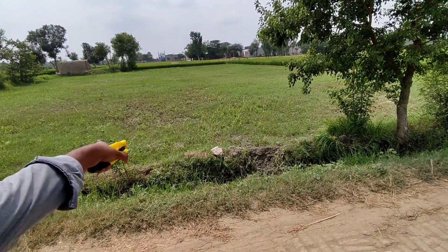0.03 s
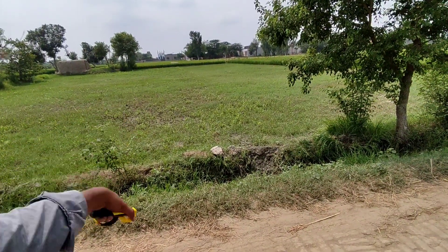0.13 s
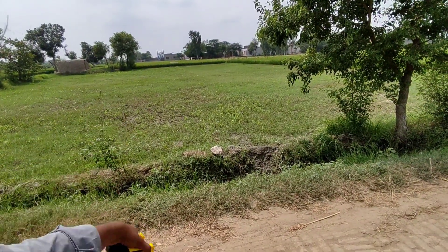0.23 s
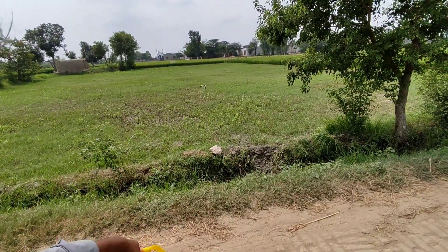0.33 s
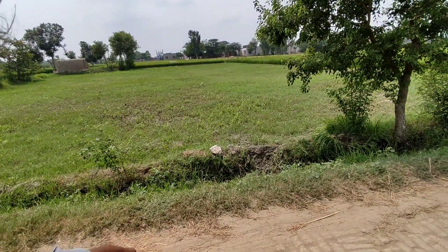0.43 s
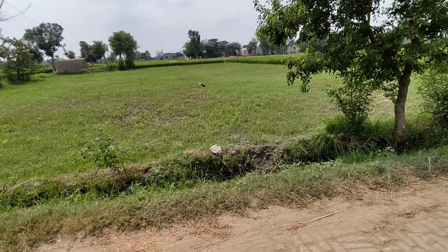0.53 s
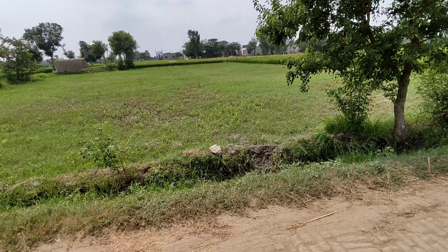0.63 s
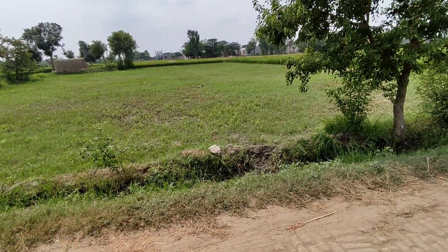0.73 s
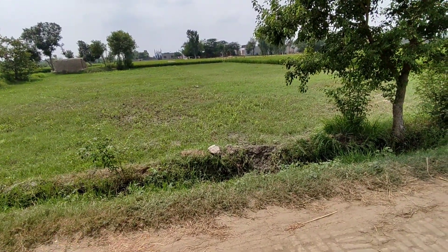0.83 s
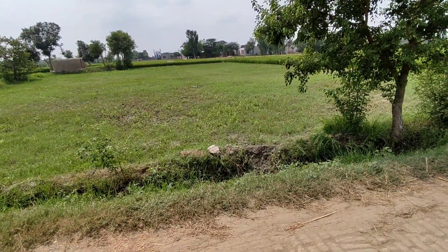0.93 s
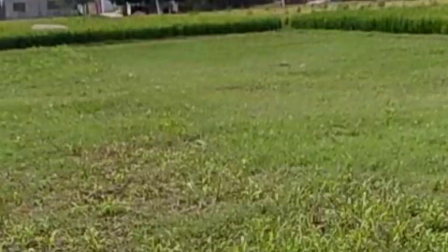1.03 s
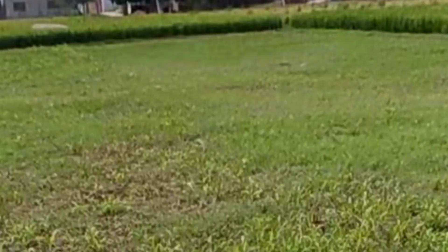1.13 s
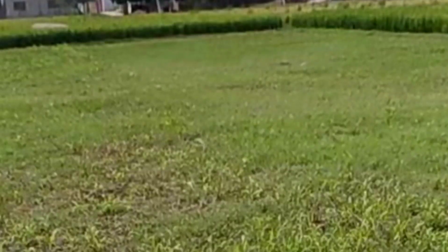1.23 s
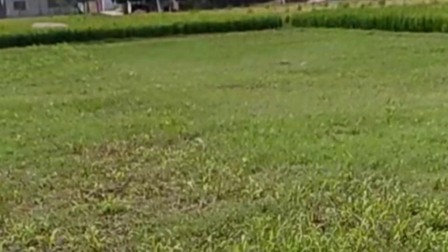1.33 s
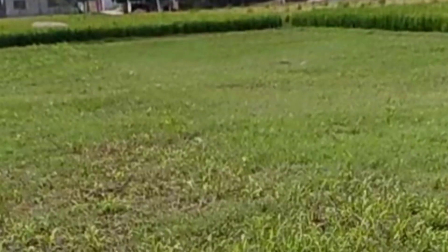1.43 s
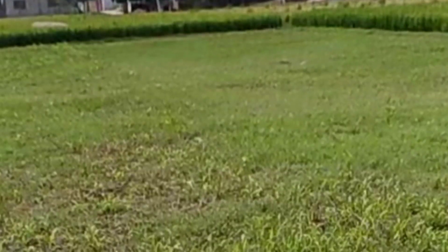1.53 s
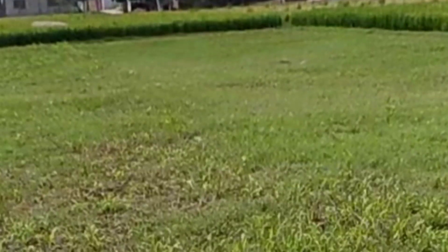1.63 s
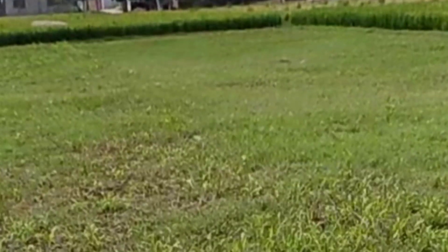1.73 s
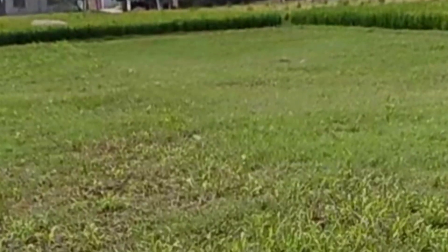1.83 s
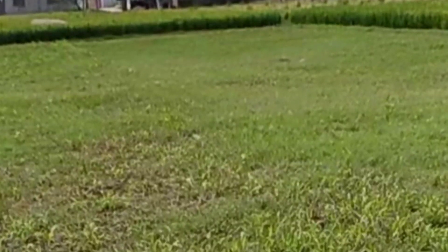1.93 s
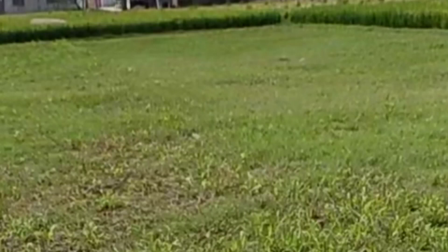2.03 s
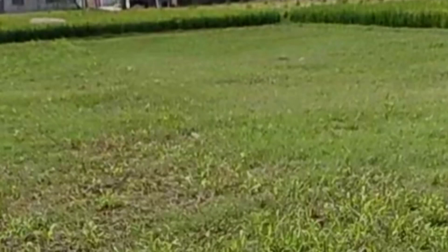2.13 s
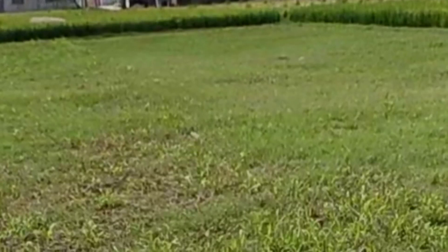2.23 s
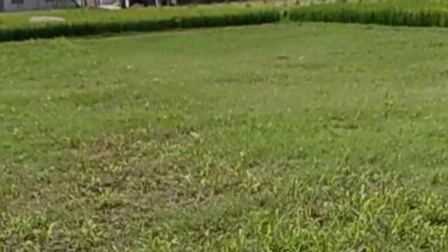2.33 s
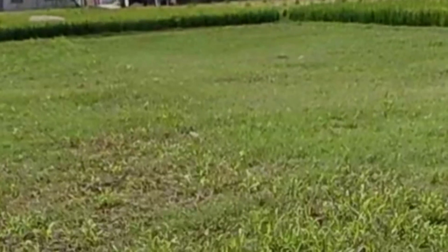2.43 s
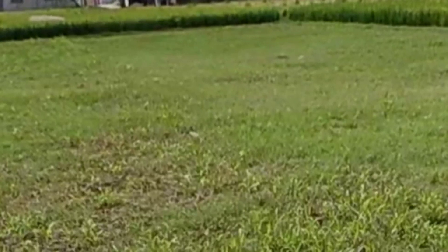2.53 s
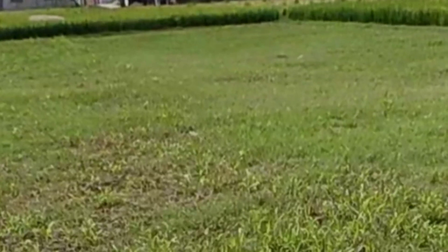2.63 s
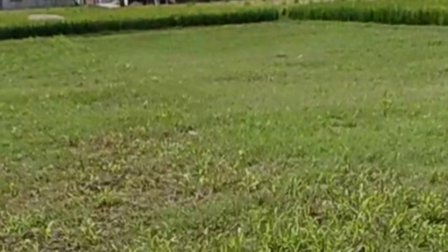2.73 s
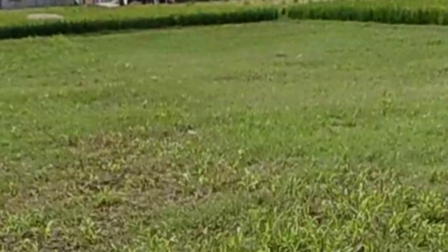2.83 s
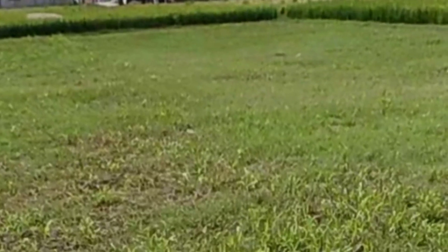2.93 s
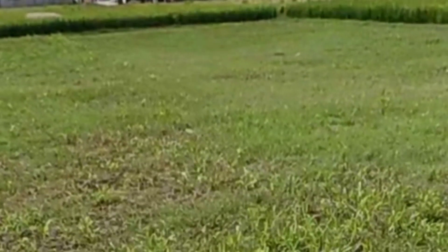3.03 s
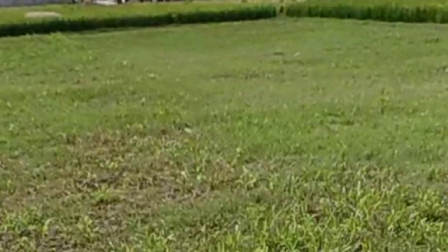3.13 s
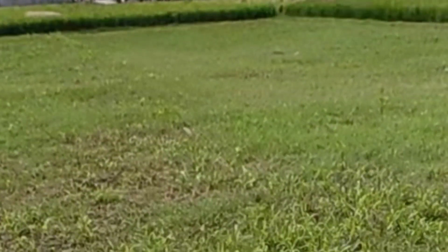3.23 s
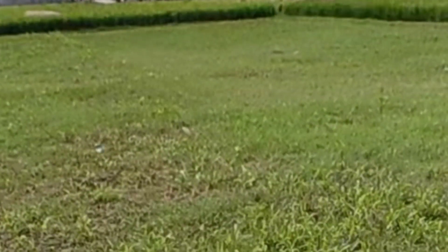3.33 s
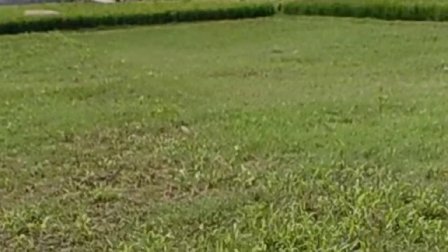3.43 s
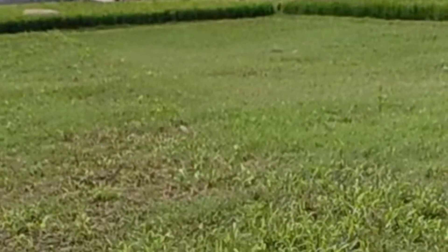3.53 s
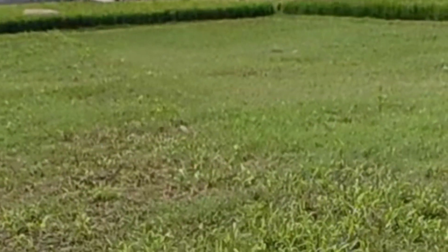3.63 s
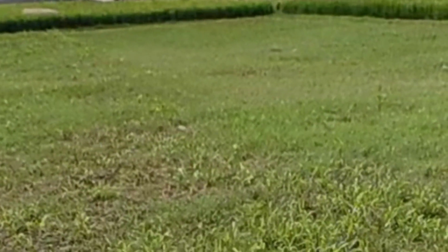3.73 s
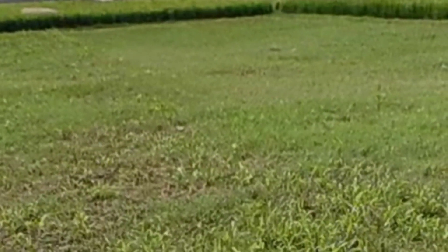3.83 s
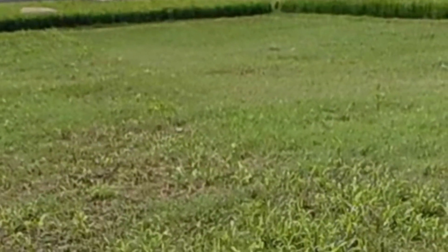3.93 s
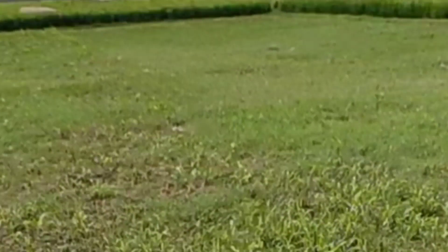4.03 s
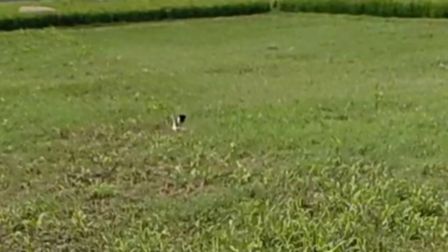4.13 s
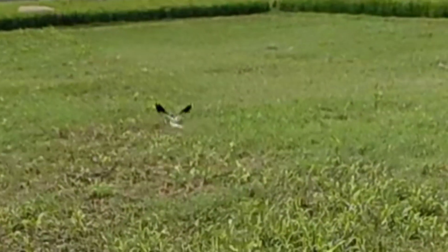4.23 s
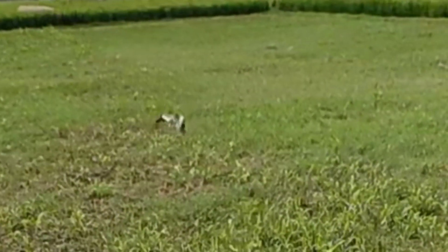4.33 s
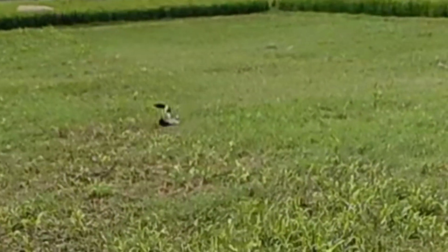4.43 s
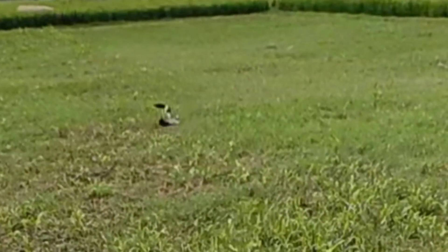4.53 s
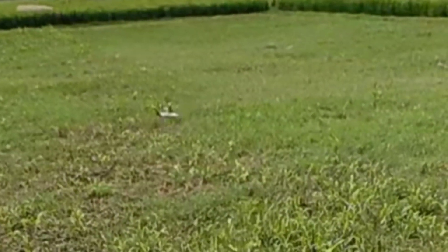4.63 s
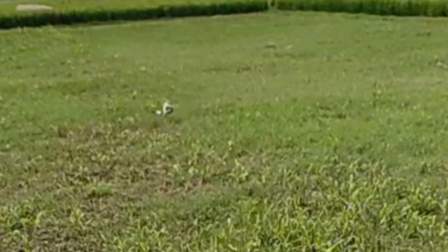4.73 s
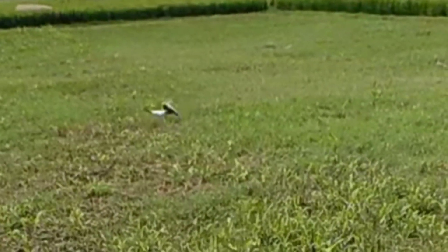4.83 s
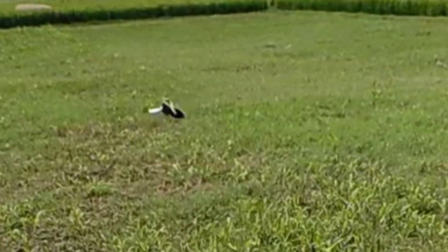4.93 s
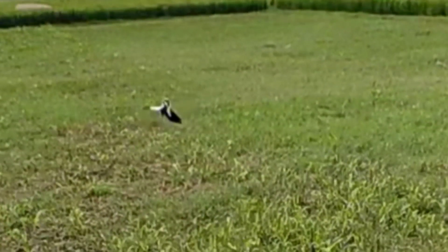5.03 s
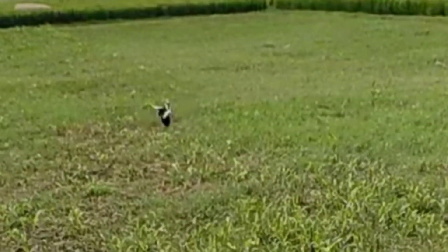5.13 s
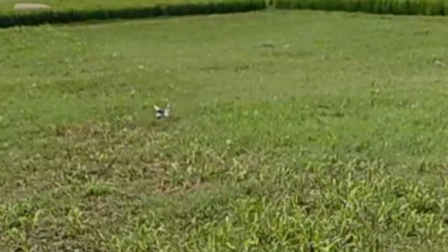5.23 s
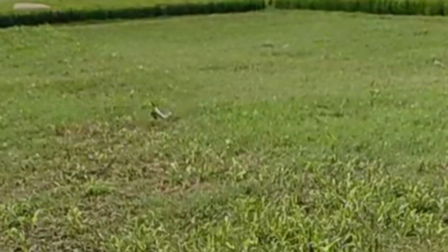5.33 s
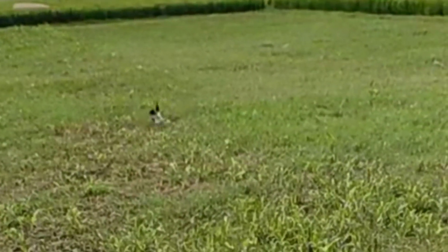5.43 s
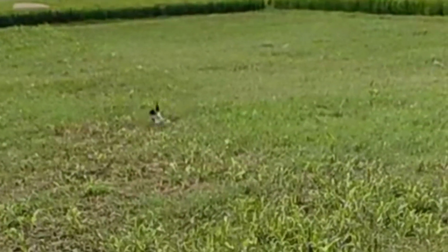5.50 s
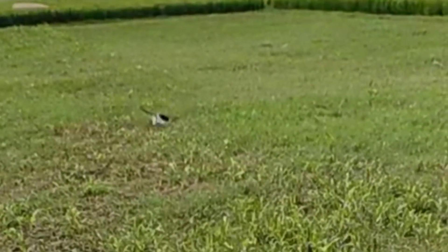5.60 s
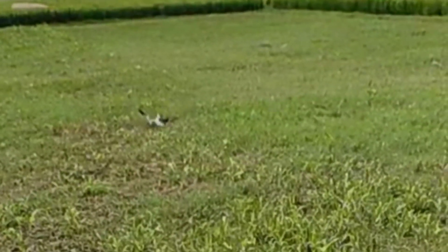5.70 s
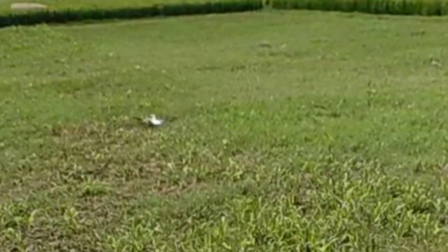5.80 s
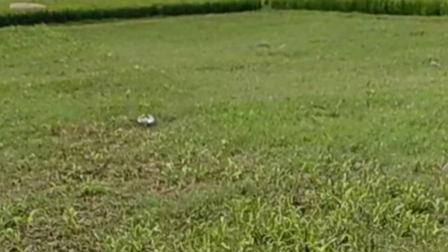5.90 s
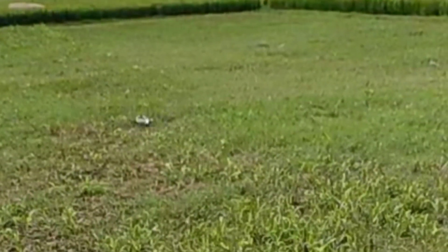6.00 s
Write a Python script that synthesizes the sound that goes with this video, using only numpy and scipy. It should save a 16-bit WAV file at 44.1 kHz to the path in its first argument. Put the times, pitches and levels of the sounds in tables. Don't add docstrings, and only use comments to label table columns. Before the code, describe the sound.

Quick elastic crack outdoors, then a muffled slow-motion replay: throbbing insect whine, three clustered rubber slaps, a hushed dip, cloth rustle and soft slack taps.

```python
import sys
import numpy as np
from scipy import signal
from scipy.fft import rfft, irfft
from scipy.io import wavfile
from scipy.ndimage import uniform_filter1d

SR = 44100
rng = np.random.default_rng(int(sys.argv[2]) if len(sys.argv) > 2 else 0)


def convert_level_to_amplitude(level_db):
    exponent = np.asarray(level_db, float) / 20
    return 10 ** exponent


def unload_audio(sound):
    columns = np.transpose(np.atleast_2d(sound))
    steps = np.round(np.clip(columns, -1, 1) * 32767)
    wavfile.write(sys.argv[1], SR, steps.astype(np.int16))


N = 267378
LENGTH = 330000
T = np.arange(LENGTH) / SR

# frequency [Hz], density [dB per Hz].
SLAP_TONE_HZ_DB = [(35, -48.5), (60, -11), (135, -14), (294, -31.5), (595, -15), (902, -25.5),
                   (1120, -20.5), (1730, -9.5), (2920, -2), (4190, -14), (4500, -38.5), (5850, -46.5),
                   (9900, -120)]
# time [s], gain [dB].
DUCK_S_DB = [
    (3.37, 0.5),
    (3.44, -3),
    (3.56, -10),
    (3.68, -13),
    (3.79, -3),
    (3.81, 2),
]
# time [s], lift [dB].
BREEZE_S_DB = [(1.4, -1.5), (1.9, -0.5), (2.7, 0.5), (2.92, 1), (3.3, 3.5), (3.82, 11.5), (3.93, 1),
               (4.2, 2), (4.5, -3), (4.65, 5.5), (5.0, -1.5), (5.6, -1.5), (5.8, -3.5), (6.2, -4),
               (6.5, -1), (6.7, 5), (6.95, 2)]


def evened(x):
    return x / np.sqrt(np.mean(x ** 2) + 1e-20)


def along(rows):
    s, *columns = np.transpose(rows)
    return [np.interp(T, s, c) for c in columns]


def coloured(points, shape):
    hz, db = np.transpose(points)
    bins_hz = np.fft.rfftfreq(shape[-1], 1 / SR)
    gain = convert_level_to_amplitude(np.interp(np.log(bins_hz + 1), np.log(hz + 1), db))
    return evened(irfft(rfft(rng.standard_normal(shape)) * gain, shape[-1]))


def resonate(x, hz, width_hz):
    turn = np.exp(2j * np.pi * np.cumsum(hz * np.ones(x.shape[-1])) / SR)
    r = np.exp(-np.pi * width_hz / SR)
    low = signal.lfilter([(1 - r) ** 2], [1, -2 * r, r * r], x * turn.conj())
    return evened((turn * low).real)


def ports(a, b, same, lag_s):
    same = np.clip(same, 0, 1)
    return np.array([np.roll(a, round(lag_s * SR)), same * a + np.sqrt(1 - same ** 2) * b])


def wander(size):
    return evened(uniform_filter1d(uniform_filter1d(rng.standard_normal(LENGTH), size), size))


def swell(s, rise_db_per_s, fall_db_per_s):
    drop_db = np.where(T < s, rise_db_per_s * (s - T), fall_db_per_s * (T - s))
    return convert_level_to_amplitude(-np.minimum(drop_db, 200))


def slaps():
    # time [s], left [dB], right [dB].
    snap_rows = [(3.3834, -36.5, -24.5), (3.3862, -27, -33.5), (3.3954, -27.5, -25.5), (3.403, -31, -39),
                 (3.4056, -38, -28), (3.4358, -27.5, -29), (3.4424, -13.5, -11), (3.4465, -21, -28.5),
                 (3.4533, -25, -25), (3.4587, -27, -21.5), (3.4625, -31.5, -25), (3.4688, -26.5, -31.5),
                 (3.4903, -42.5, -28.5), (3.5055, -33, -22), (3.5118, -15, -30), (3.5199, -23, -33),
                 (3.523, -23, -35.5), (3.5282, -22.5, -21), (3.5378, -29.5, -40.5), (3.5417, -30, -36.5),
                 (3.547, -43.6, -35.0)]
    # time [s], left [dB], right [dB], extra thud [dB].
    tap_rows = [(2.2362, -42, -63.5, -6), (2.2484, -44.5, -55, -8), (3.9419, -49, -32.5, -7),
                (3.956, -45, -42.5, 1), (4.4272, -54, -36, 4.5), (4.5468, -53, -33.5, -4),
                (4.556, -32.5, -40, 9), (4.5634, -32, -30, 9), (4.5824, -51.5, -32.5, -6),
                (4.601, -39, -52.5, -4), (4.6734, -38, -46, 1), (4.736, -36, -35.5, 31),
                (4.744, -32.5, -36, 14.5), (4.7626, -39, -56, -15)]
    # frequency [Hz], density [dB per Hz].
    thud_tone = [(59, -28.5), (100, 4), (160, -12.5), (322, -6), (651, -2), (907, -17), (1200, 3.5),
                 (1500, -14.5), (1720, -16.5), (1900, -18), (2470, -42.5), (4180, -120)]
    rise_s, ring_t60_s, crack_t60_s, crack_db = .0016, .007, .035, -8
    ring_hz, ring_spread_hz, ring_left_hz_per_db = 2830, 100, 7
    thud_db, thud_left_per_db, volley_thud_db = -17.5, .27, 9
    out = np.zeros((2, LENGTH))
    t = np.arange(-200, 3800) / SR
    rise = np.exp(-(np.minimum(t, 0) / rise_s) ** 2)
    after = np.maximum(t, 0)
    hits = [(*row, volley_thud_db * (k < 5)) for k, row in enumerate(snap_rows)] + tap_rows
    for s, left_db, right_db, extra_db in hits:
        lean_db = left_db - right_db
        hz = ring_hz + ring_left_hz_per_db * lean_db + ring_spread_hz * rng.standard_normal()
        low_db = thud_db + thud_left_per_db * np.clip(lean_db, -12, 12) + extra_db
        phase = .25 * rng.random((2, 1))
        port_hz = hz * (.98 + .04 * rng.random((2, 1)))
        ring = np.sqrt(2) * np.cos(2 * np.pi * (port_hz * t + phase)) * convert_level_to_amplitude(-60 * after / ring_t60_s)
        crack = coloured(SLAP_TONE_HZ_DB, (2, len(t))) * convert_level_to_amplitude(crack_db - 60 * after / crack_t60_s)
        thud = coloured(thud_tone, (2, len(t))) * convert_level_to_amplitude(low_db - 60 * after / crack_t60_s)
        slap = rise * (ring + crack + thud)
        slap *= np.sqrt(2) / abs(slap).max(axis=1, keepdims=True)
        at = round(s * SR) - 200
        out[:, at:at + len(t)] += convert_level_to_amplitude(np.array([[left_db], [right_db]]) + 1.0) * slap
    edge = signal.firwin(511, 4450, window=("kaiser", 7), fs=SR)
    return signal.oaconvolve(out + swish(), edge[None], "same")


def swish():
    # time [s], left [dB], right [dB], fall [dB/s].
    swish_rows = [
        (3.378, -33.5, -29, 400.5),
        (3.437, -24.5, -27.5, 300.5),
        (3.507, -26, -26.5, 600),
        (3.56, -51.5, -52.5, 95),
        (3.811, -50.5, -51, 72),
        (4.452, -64.5, -71, 904.5),
        (4.557, -34.5, -56, 497),
        (4.738, -40, -40.5, 402),
    ]
    level = 0
    for s, left_db, right_db, fall in swish_rows:
        level = level + convert_level_to_amplitude(np.array([[left_db], [right_db]])) * swell(s, 2197.5, fall)
    return level * convert_level_to_amplitude(2.7 * wander(size=40)) * coloured(SLAP_TONE_HZ_DB, (2, LENGTH))


def pushes():
    # time [s], left pressure, right pressure [full scale], rise [s], fall [s].
    push_rows = [(3.386, -0.021, -0.021, 0.00413, 0.0074), (3.4, 0.00797, 0.0085, 0.054, 0.01464),
                 (3.445, 0.0077, -0.062, 0.0047, 0.027), (3.68, -0.025, 0.035, .09, 0.55),
                 (3.815, 0.019, 0.019, 0.00776, 0.089), (5.17, -0.0024, -0.0053, 0.081, 0.045),
                 (5.195, 0.002, 0.0074, 0.0045, 0.012), (5.215, 0.0064, -0.015, 0.024, 0.031),
                 (5.57, -0.0032, -0.014, 0.018, 0.014), (5.615, 0.0065, -0.008, 0.0098, 0.009),
                 (5.648, -0.0041, 0.031, 0.0058, 0.011), (5.68, 0.0026, -0.013, 0.036, 0.09),
                 (6.85, -0.00024, -0.0093, 0.049, 0.037), (6.94, -0.0015, 0.046, 0.0097, 0.008),
                 (6.96, 0.01, -0.02, 0.035, 0.011)]
    out = np.zeros((2, LENGTH))
    t = np.arange(-12000, 20000) / SR
    for s, left, right, rise_s, fall_s in push_rows:
        shape = np.exp(-(np.minimum(t, 0) / rise_s) ** 2 - np.maximum(t, 0) / fall_s)
        at = round((s + t[0]) * SR)
        out[:, at:at + len(t)] += np.array([[left], [right]]) * shape
    return uniform_filter1d(out, size=150, axis=1)


def rustle():
    # time [s], peak [dB], rise [dB/s], fall [dB/s].
    move_rows = [
        (3.81, -52, 798, 363.5),
        (4.1, -61, 22.5, 111.5),
        (4.55, -58.5, 95.5, 51.5),
        (4.7, -57, 92.5, 129.5),
        (4.95, -73.5, 32.5, 18),
        (5.8, -67.5, 39.5, 6.5),
        (6.4, -69, 18.5, 37),
        (7.2, -60, 82, 38.5),
    ]
    # time [s], centre [Hz], narrow share [0-1].
    tint_rows = [(3.8, 1200, .3), (3.95, 1700, .1), (4.9, 1800, .1), (5.5, 1420, 1), (6.4, 1400, .9),
                 (6.6, 550, .9)]
    hz, narrow = along(tint_rows)
    grains = rng.standard_normal((2, LENGTH)) * convert_level_to_amplitude(3.5 * wander(size=200))
    sound = narrow * resonate(grains, hz, 1500) + (1 - narrow) * resonate(grains, hz, 2803)
    level = sum(convert_level_to_amplitude(db) * swell(s, rise, fall) for s, db, rise, fall in move_rows)
    return level * convert_level_to_amplitude(np.array([[2.5], [-2.5]])) * sound


def knock():
    parts_hz_width_db = [(239, 90, -55.5), (400, 220, -65.5), (800, 670, -68)]
    body = sum(convert_level_to_amplitude(db) * resonate(rng.standard_normal(LENGTH), hz, width_hz)
               for hz, width_hz, db in parts_hz_width_db)
    return swell(2.7, rise_db_per_s=720, fall_db_per_s=450) * body


def cicada(level_db, hz, pan_db, depth_db, throb_hz, width_hz, skirt_db, tone_db):
    belly, wings = rng.standard_normal((2, 2, LENGTH))
    turns = np.cumsum(throb_hz * (1 + 0.04 * wander(size=6000))) / SR
    throb = convert_level_to_amplitude(depth_db * (np.cos(2 * np.pi * turns) + 0.21 * np.cos(4 * np.pi * turns + 2.9)))
    tone_turns = np.cumsum(hz + 22 * wander(size=500)) / SR
    tone = convert_level_to_amplitude(tone_db) * np.sqrt(2) * np.cos(2 * np.pi * tone_turns)
    song = (tone + resonate(belly, hz, width_hz)) * throb
    song = song + convert_level_to_amplitude(skirt_db) * resonate(wings, hz * 1.1, 400)
    gain = convert_level_to_amplitude(level_db + pan_db * np.array([[.5], [-.5]]))
    return gain * evened(ports(*song, same=.6, lag_s=0.0013095))


def cicadas():
    # time [s], level [dB], pitch [Hz], left over right [dB].
    long_song = [(1.4, -56, 2890, 13.5), (2.2, -59, 2895, 9.5), (2.6, -62.5, 2850, 10.5),
                 (3.25, -60, 2835, 6.5), (3.98, -59.5, 2850, 2), (4.4, -58, 2890, 9.5),
                 (4.9, -64, 2910, 22), (5.27, -65.5, 2910, 3), (5.83, -62.5, 2984, 17.5),
                 (6.1, -61, 3005, 14.5), (6.4, -62.5, 2975, 17), (6.95, -59, 2976, 12.5)]
    # time [s], level [dB], pitch [Hz].
    short_song = [(1.2, -60.5, 3020), (1.6, -63.5, 3128), (1.74, -59, 2866), (1.82, -81.5, 3012)]
    first = cicada(*along(long_song), depth_db=2.5 + 2.5 * wander(size=5000), throb_hz=17.6,
                   width_hz=140, skirt_db=-14, tone_db=-2)
    second = cicada(*along(short_song), pan_db=13.5, depth_db=0.5, throb_hz=33.33,
                    width_hz=92, skirt_db=-13.5, tone_db=0)
    return first + second


def birds():
    # start [s], length [s], first pitch [Hz], last pitch [Hz], level [dB].
    call_rows = [(1.333, 0.028, 3160, 3650, -59), (1.716, 0.055, 2150, 2564, -65.5),
                 (1.82, .054, 2480, 2247, -66.5), (2.013, 0.064, 1590, 1345, -68),
                 (2.115, 0.038, 1310, 1496, -69.5), (2.161, 0.058, 1040, 985, -62),
                 (2.389, 0.062, 1455, 1660, -73), (2.446, 0.15, 1650, 1319, -72.5),
                 (3.803, .15, 1120, 1030, -59), (4.058, 0.072, 1772, 1368, -65),
                 (5.772, 0.044, 1720, 1380, -63.5)]
    out = np.zeros(LENGTH)
    for start_s, length_s, first_hz, last_hz, db in call_rows:
        at = round(start_s * SR)
        u = np.linspace(0, 1, round(length_s * SR))
        hz = (first_hz + (last_hz - first_hz) * u) * (1 + .02 * np.sin(np.pi * u))
        flutter = 1 + .4 * evened(uniform_filter1d(rng.standard_normal(len(u)), size=200))
        whistle = np.sqrt(np.sin(np.pi * u)) * np.sin(2 * np.pi * np.cumsum(hz) / SR)
        out[at:at + len(u)] += convert_level_to_amplitude(db) * flutter * whistle
    return np.array([np.roll(out, 57), out])


def wash():
    # frequency [Hz], density [dB per Hz].
    leaf_tone = [(40, -21.5), (104, -36.5), (314, -38.5), (420, -37.5), (604, -37.5), (900, -40.5),
                 (1560, -43.5), (2200, -39), (2700, -24.5), (3200, -37.5), (4110, -49), (4260, -42.5),
                 (4330, -88.5)]
    air = ports(*coloured(leaf_tone, (2, LENGTH)), same=.5, lag_s=.0013)
    return convert_level_to_amplitude(-61 + 0.691 * along(BREEZE_S_DB)[0] + np.array([[.7], [-.7]])) * air


def hum():
    # frequency [Hz], width [Hz], level [dB].
    order_rows = [
        (19.44, 9.6, -56),
        (31.014, 12, -70),
    ]
    rumble_tone_hz_db = [(25, -21.0), (40, 4), (110, -7), (300, -15), (700, -26.0), (1500, -49.5)]
    orders = sum(convert_level_to_amplitude(db) * ports(*resonate(rng.standard_normal((2, LENGTH)), hz, width_hz), same=.9, lag_s=0)
                 for hz, width_hz, db in order_rows)
    level_db = -70 + 1.4 * along(BREEZE_S_DB)[0] + 5.5 * wander(size=3000)
    ducking = (T > DUCK_S_DB[0][0]) * (T < DUCK_S_DB[-1][0])
    level_db += 2.5 * np.minimum(along(DUCK_S_DB)[0] - DUCK_S_DB[0][1] * ducking, 0)
    lumps = ports(*coloured(rumble_tone_hz_db, (2, LENGTH)), same=0.71, lag_s=.0002)
    return orders + convert_level_to_amplitude(level_db + np.array([[-2.5], [.7]])) * lumps


def emptied(x, size, band, chance):
    hz, t, z = signal.stft(x, SR, nperseg=size)
    level_db = 10 * np.log10(uniform_filter1d((abs(z) ** 2).sum(0), band, axis=0) + 1e-16)
    depth_db = uniform_filter1d(level_db, 12 * band, axis=0) - level_db
    keep = ~chance(hz[:, None], t, depth_db)[np.arange(len(hz)) // band * band]
    return signal.istft(z * keep, SR, nperseg=size)[1][:, :LENGTH]


def sparse(quiet, hits):
    # start [s], end [s], share of emptied bands [0-1].
    blotch_rows = [(3.3, 3.43, .3), (3.47, 3.5, .3), (3.83, 3.94, .4), (4.33, 4.545, .4), (4.575, 4.73, .4),
                   (4.75, 4.84, .4)]
    from_hz = 720

    def weak(hz, t, depth_db):
        mood = evened(uniform_filter1d(rng.standard_normal(depth_db.shape), size=11, axis=1))
        weakness_db = 2 * uniform_filter1d(depth_db, size=5, axis=1) + 4.0 * mood
        return (weakness_db > 5.6) & (hz > from_hz) & (abs(hz - 2750) > 450)

    def blotch(hz, t, depth_db):
        share = sum(part * ((t > start) & (t < end)) for start, end, part in blotch_rows)
        luck = np.repeat(rng.random(depth_db.shape), 3, axis=1)[:, :len(t)]
        return (luck < share) & (depth_db > -3) & (hz > from_hz)

    edge = signal.firwin(1023, 4290, window=("kaiser", 8), fs=SR)
    thinned = signal.oaconvolve(emptied(quiet, 2048, 3, weak), edge[None], "same")
    return emptied(thinned + hits, 512, 3, blotch)


def starved(hz, t, depth_db):
    # centre [Hz], half width [Hz], share of blocks emptied [0-1].
    thin_rows = [(2900, 450, .3), (6000, 900, .1), (12200, 1300, .2)]
    share = sum(part * (abs(hz - centre_hz) < half_hz) for centre_hz, half_hz, part in thin_rows)
    luck = np.repeat(rng.random(depth_db.shape), 6, axis=1)[:, :len(t)]
    return (luck < share) & (depth_db > -2) & (t > .27)


def scene():
    quiet = (cicadas() + wash() + hum()) * convert_level_to_amplitude(along(DUCK_S_DB)[0]) + rustle() + birds() + knock()
    field = sparse(quiet, slaps()) + pushes()
    full_start_s = 3.0647
    full = signal.resample_poly(field[:, round(full_start_s * SR):], 72, 241, axis=1) * convert_level_to_amplitude(6.5)
    full = np.pad(emptied(full, 1024, 5, starved), ((0, 0), (0, N)))[:, :N]
    t = T[:N]
    full_gain = np.interp(t, (1.137, 1.206), [1, .27]) * (t < 1.265)
    slow_gain = np.interp(t, (1.23, 1.364), [0, 1])
    return full * full_gain + field[:, :N] * slow_gain


def low_pass(x):
    return signal.sosfilt(signal.butter(12, 15630, fs=SR, output="sos"), x)


def record(dry):
    edge = signal.firwin(255, 15200, window=("kaiser", 8), fs=SR)
    mix = signal.oaconvolve(dry, edge[None], "same")
    return low_pass(mix)


dry = scene()
out = record(dry)
unload_audio(out)
```